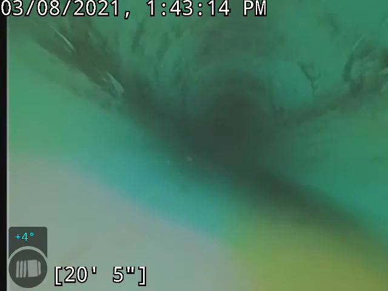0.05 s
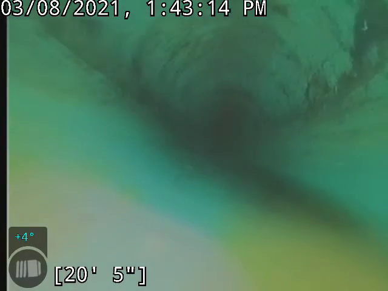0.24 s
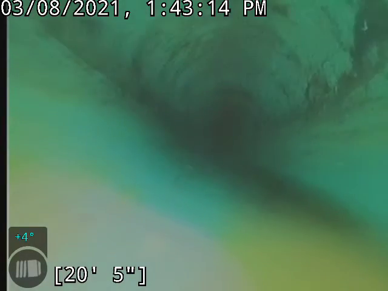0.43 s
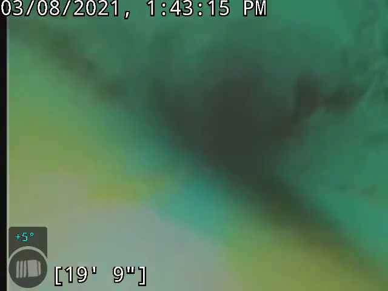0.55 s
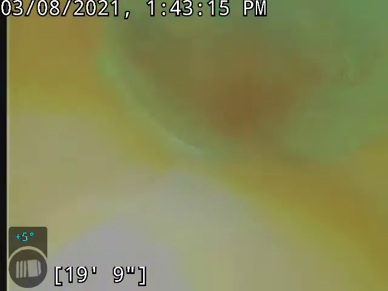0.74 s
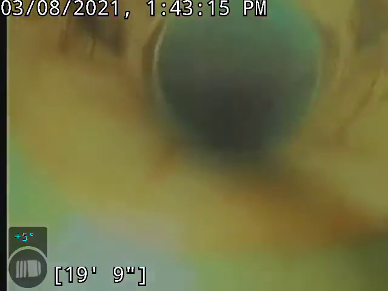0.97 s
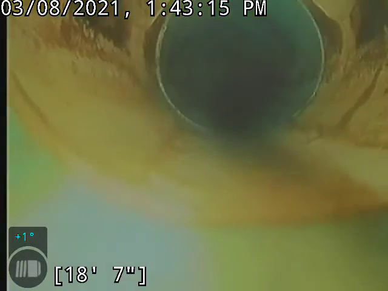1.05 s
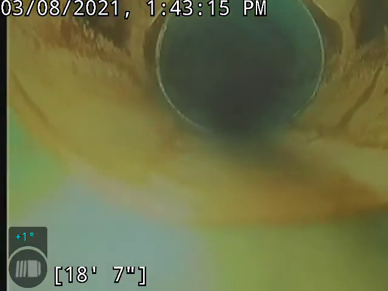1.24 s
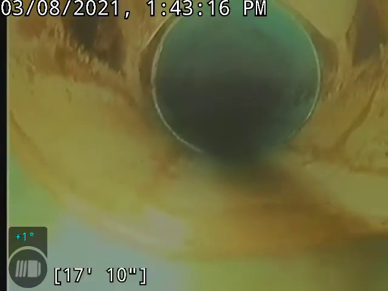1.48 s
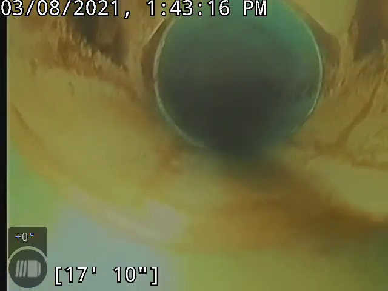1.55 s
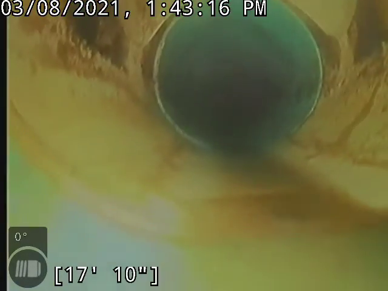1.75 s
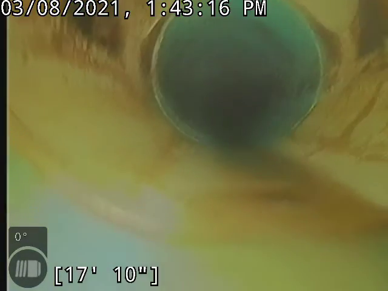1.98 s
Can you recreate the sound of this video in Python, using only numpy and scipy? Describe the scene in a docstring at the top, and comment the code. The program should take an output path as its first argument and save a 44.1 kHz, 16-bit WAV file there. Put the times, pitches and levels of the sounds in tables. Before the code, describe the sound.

A push cable is pulled from a drain onto its reel, close in a small room. Low uneven rumble and scraping open with faint taps; a soft airy swish comes near 0.35 s. Hollow, clacking frame knocks fall at 0.49, 0.89 (softer, duller), 1.28 (strongest, sharper) and 1.69 s, each with a quick rattle. Dull coil thumps continue to 1.8 s; rumble and scrape thin after 1.1 s over quiet low background.

```python
"""In a small room, a push cable is pulled back out of a drain and fed onto its reel.
The reel frame knocks about every 0.4 s: ringing modes and noise bursts, with light cable taps between.
Turns of cable thump dully on the coil, as low modes under a short bump, and the turning reel rumbles.
The cable scrapes in its guide as uneven noise through resonances, and hisses and once swishes as it slides.
A low steady background of coloured noise lies beneath."""
import sys
import numpy as np
from scipy import signal
from scipy.fft import rfft, irfft, next_fast_len
from scipy.io import wavfile
from scipy.ndimage import map_coordinates

SR = 44100
rng = np.random.default_rng(int(sys.argv[2]) if len(sys.argv) > 2 else 0)


def materialize(psi):
    """Save the field psi as 16-bit PCM at rate SR to the path in sys.argv[1].

    A 1-D psi becomes a single channel; in a 2-D psi each row is a channel.
    """
    bounded = np.clip(np.atleast_2d(psi).T, -1, 1)
    quanta = np.round(bounded * 32767).astype(np.int16)
    wavfile.write(sys.argv[1], SR, quanta)


N = 88817  # samples

# Knocks of the reel frame: start_s, level_db, boom_db, hardness_hz (contact low-pass), tick_db,
# crack_db, rattle_delay_s, rattle_db, thock_hz, thock_db; layers are relative to level_db
REEL_KNOCKS = [(0.4863, -29, -5.5, 2320, -30, -3.5, 0.046, -11.5, 798, 5.5),
               (0.8934, -36, 2, 1670, -33, -26, 0.027, -13, 910, 6.5),
               (1.2786, -27, -2, 2400, -7, -12, .04, -11.5, 964, -3),
               (1.6875, -30.5, 1, 2460, -16, -3, 0.014, -1.5, 696, 4)]
# Light taps of the cable: start_s, level_db, hardness_hz, tick_db
CABLE_TAPS = [(0.014, -46.5, 2460, -25), (0.082, -42.5, 1870, -22), (0.439, -45, 2520, -20),
              (0.739, -45.5, 1480, -25), (0.977, -45, 1490, -25), (1.054, -43, 4300, 2),
              (1.186, -45.5, 1410, -23), (1.597, -56.5, 2500, -18), (1.799, -39, 1140, -25)]
# Dull thumps of the coil: start_s, level_db, bump_hz, bump_db
COIL_THUMPS = [(0.309, -38.5, 334, -6), (0.498, -36, 310, 0.5), (0.597, -39.5, 327, -11),
               (0.741, -46, 457, 12.5), (0.903, -33.5, 289, -9), (0.983, -47.5, 342, 9),
               (1.065, -41.5, 337, -10), (1.284, -43, 375, 6), (1.321, -55, 470, 22.5),
               (1.664, -52, 319, 17.5), (1.699, -38.5, 275, 9.5), (1.715, -43, 402, 15),
               (1.802, -31, 314, 4)]
# Modes of the reel frame, then of the coil: pitch_hz, level_db (before scatter), t60_s
FRAME_MODES = [(247, -17, 0.38), (326.3, -11.5, 0.17), (452, -10.5, 0.2), (507, -15, 0.32),
               (721.7, -2.5, .1), (821, -8, 0.071), (927, -6.5, 0.039), (984, -9, 0.091), (1090, -7, 0.042),
               (1326, -10, 0.076), (1654, -11.5, 0.088), (1779, -16.5, 0.076), (1980, -29, 0.072),
               (2477, -20, .09)]
COIL_MODES = [(118.5, -9, 0.25), (150.7, -5.5, 0.29), (181.3, -4, 0.21), (292, -17, 0.14),
              (428.5, -14, 0.15)]

# Spectrum shapes of the noise bursts in a knock: freq_hz, density_db (per Hz, relative)
CLACK_COLOUR = [(150, -42), (350, -15), (570, -1), (800, 2.5), (1300, -5.5), (1800, -2), (2150, -10),
                (2600, -6.5), (3200, -13), (5000, -12.5), (7500, -15), (14000, -13.5)]
BOOM_COLOUR = [(60, -19), (165, 3), (240, -4), (330, 5.5), (460, -3), (600, -10), (1500, -57)]
TICK_COLOUR = [(1500, -35), (4500, -4), (7500, -10), (9500, 5), (13500, -4)]
CRACK_COLOUR = [(800, -12), (1700, 10.5), (2300, 0), (4500, 2), (6500, -21), (9000, -27)]

# Levels over time, before any trim: time_s, level_db
# Rumble, scrape, rubbing resonance, sliding hiss, and one quick slip of the cable
RUMBLE_LEVEL = [(0, -46), (.18, -50.5), (.27, -48), (.35, -44.5), (.5, -48), (.65, -44.5), (.75, -48.5),
                (.84, -46.5), (.93, -43.5), (1.06, -45), (1.16, -54.5), (1.32, -49.5), (1.42, -59),
                (1.65, -55.5), (1.85, -50.5), (2.01, -62)]
SCRAPE_LEVEL = [(0, -54.5), (.12, -54), (.27, -58.5), (.45, -46.5), (.62, -49), (.82, -50), (1.06, -48.5),
                (1.14, -60), (1.25, -58.5), (1.45, -80), (1.62, -60), (1.85, -60.5), (2.01, -75)]
SING_LEVEL = [(0, -54), (.22, -60), (.4, -69), (.75, -60), (1.0, -84), (1.25, -57), (1.42, -82),
              (2.01, -72)]
SLIDE_LEVEL = [(0, -69), (.25, -68.5), (.5, -53.5), (.6, -60.5), (.85, -62.5), (1.05, -63), (1.19, -70.5),
               (1.26, -66), (1.35, -59.5), (1.55, -61), (1.7, -61), (1.87, -68), (2.01, -89)]
SWISH_LEVEL = [(.22, -83), (.3, -51), (.35, -46), (.43, -48), (.52, -57), (.62, -86)]

# Spectrum shapes of the lasting sounds: freq_hz, density_db (per Hz, relative)
RUMBLE_COLOUR = [(20, -31), (58, -17), (76, 4.5), (100, -1), (133, 0), (185, -6.5), (230, -15),
                 (300, -10.5), (400, -11.5), (560, -29), (1200, -54.5)]
SCRAPE_SPECTRUM = [(150, 10), (320, 3), (450, -7.5), (580, -7.5), (730, -5.5), (930, -5.5), (1200, -16),
                   (1500, -7.5), (1750, -8.5), (2100, -10.5), (2600, -9), (3400, -18.5), (5500, -22),
                   (7500, -30), (14000, -49)]
SLIDE_SPECTRUM = [(800, -3), (3000, -12), (5500, -10.5), (7000, -11.5), (7700, -20.5), (9000, -4),
                  (10300, -2.5), (11200, -4), (12500, 2), (14000, -6.5)]
SWISH_SPECTRUM = [(1500, -18), (3800, -20.5), (5500, -12.5), (7500, -14.5), (9000, -9.5), (10300, 0),
                  (12500, -0.5), (14000, -3.5)]
BACKGROUND_COLOUR = [(15, -1.5), (26, -2.5), (40, -1), (52, -4.5), (100, -16.5), (160, -9), (350, -18),
                     (550, -34), (2000, -49), (14000, -74)]

# Decay of the room: freq_hz, t60_s
ROOM_DECAY = [(150, 0.57), (700, 0.22), (2500, 0.34), (6000, 0.54), (13000, 0.033)]
# Colour of the microphone: freq_hz, gain_db
MIC_COLOUR = [(6000, 0), (7000, -2.5), (7650, -2), (8500, 0), (13600, 1.5), (14050, -12)]

# Decays to -60 dB, then attack time constants
CLACK_T60_S, BOOM_T60_S, TICK_T60_S, CRACK_T60_S = 0.076, 0.11, 0.018, 0.015
THOCK_T60_S, BUMP_T60_S = 0.05, 0.063
ATTACK_S, BOOM_ATTACK_S, THOCK_ATTACK_S, THUMP_ATTACK_S = 0.00095, 0.0037, 0.0013, 0.0025
# Layer levels and trims
RING_DB, CLACK_DB, MODE_SCATTER_DB = -5, 1, 2
RUMBLE_TRIM_DB, SCRAPE_TRIM_DB, SLIDE_TRIM_DB = 1.5, -1.5, 0.5
SCRAPE_RING_DB, BACKGROUND_DB = -7, -53
SING_HZ, SING_WIDTH_HZ = 856, 123  # centre and half-width of the rubbing resonance
ROOM_DB, ROOM_DELAY_S = -8.5, 0.006
TOP_HZ = 14050  # band limit


def amp(db):
    """Decibels to gain."""
    return 10 ** (np.asarray(db) / 20)


def unit(x):
    """Scale to rms 1."""
    return x / np.sqrt(np.mean(x ** 2) + 1e-20)


def along(points, hz):
    """Read (Hz, value) points on a log frequency axis."""
    f, v = np.transpose(points)
    return np.interp(np.log(hz + 1), np.log(f + 1), v)


def curve(rows):
    """Join (s, value) points with straight lines, one value per sample."""
    return np.interp(np.arange(N) / SR, *np.transpose(rows))


def wobble(rate_hz):
    """A smooth random curve with rate_hz knots a second."""
    knots = rng.standard_normal(int(N * rate_hz / SR) + 4)
    return map_coordinates(knots, [np.arange(N) * rate_hz / SR])


def filtered(x, response):
    """Shape the spectrum of x by a response of frequency."""
    m = next_fast_len(len(x) + SR // 4)
    return irfft(rfft(x, m) * response(np.fft.rfftfreq(m, 1 / SR)), m)[:len(x)]


def noise(colour, size=N):
    """Coloured noise of rms 1."""
    return unit(filtered(rng.standard_normal(size), lambda hz: amp(along(colour, hz))))


def fade(t, t60):
    """Exponential decay, 60 dB in t60 seconds."""
    return np.exp(-np.log(1000) * t / t60)


def rise(t, attack):
    """Exponential onset with the given time constant in seconds."""
    return 1 - np.exp(-t / attack)


def tone(t, hz, t60):
    """One decaying resonance at a random phase."""
    return np.sin(2 * np.pi * (hz * t + rng.random())) * fade(t, t60)


def ring(modes, t):
    """Sum of damped modes, their levels and phases a little different at every blow."""
    out = np.zeros(len(t))
    for hz, db, t60 in modes:
        out += amp(db + MODE_SCATTER_DB * rng.standard_normal()) * tone(t, hz, t60)
    return out


def add(track, s, x):
    """Mix x into the track at time s."""
    part = track[round(s * SR):][:len(x)]
    part += x[:len(part)]


def in_room(x):
    """A short sound followed by the room's answer, noise that decays at its own rate in each band."""
    hz, t, z = signal.stft(rng.standard_normal(SR // 2), SR, nperseg=256)
    tail = signal.istft(z * fade(t, along(ROOM_DECAY, hz)[:, None]), SR, nperseg=256)[1]
    tail = unit(tail) / np.sqrt(len(tail))  # energy 1
    tail = np.pad(tail, (round(ROOM_DELAY_S * SR), 0))
    return x + amp(ROOM_DB) * signal.fftconvolve(x, tail)[:len(x)]


def contact(t, hard_hz, tick_db):
    """One contact with the frame: ringing modes and a dense clack, duller when soft, and a tick."""
    clack = noise(CLACK_COLOUR, size=len(t)) * fade(t, CLACK_T60_S)
    body = amp(RING_DB) * ring(FRAME_MODES, t) + amp(CLACK_DB) * clack
    body = signal.lfilter(*signal.butter(2, hard_hz, fs=SR), body)
    tick = amp(tick_db) * noise(TICK_COLOUR, size=len(t)) * fade(t, TICK_T60_S)
    return (body + tick) * rise(t, ATTACK_S)


def reel_knocks():
    """Each frame contact has a boom, a crack, a thock set by the point of contact, and one rattle."""
    out, t = np.zeros(N), np.arange(SR // 2) / SR
    swell = rise(t, BOOM_ATTACK_S)
    for (s, db, boom_db, hard_hz, tick_db, crack_db,
         rattle_s, rattle_db, thock_hz, thock_db) in REEL_KNOCKS:
        boom = amp(boom_db) * noise(BOOM_COLOUR, size=len(t)) * swell * fade(t, BOOM_T60_S)
        thock = amp(thock_db) * tone(t, thock_hz, THOCK_T60_S) * rise(t, THOCK_ATTACK_S)
        crack = noise(CRACK_COLOUR, size=len(t)) * fade(t, CRACK_T60_S) * rise(t, ATTACK_S)
        blow = in_room(contact(t, hard_hz, tick_db) + boom)
        add(out, s, amp(db) * (blow + thock + amp(crack_db) * crack))  # thock and crack stay dry
        rattle = in_room(swell * contact(t, hard_hz=1870, tick_db=-23))
        add(out, s + rattle_s, amp(db + rattle_db) * rattle)
    return out


def cable_taps():
    """Light taps of the cable set off the frame's modes, clack and tick."""
    out, t = np.zeros(N), np.arange(SR // 2) / SR
    for s, db, hard_hz, tick_db in CABLE_TAPS:
        add(out, s, amp(db) * in_room(contact(t, hard_hz, tick_db)))
    return out


def coil_thumps():
    """Turns of cable drop against the coil: a short bump over its low modes."""
    out, t = np.zeros(N), np.arange(SR // 2) / SR
    onset = rise(t, THUMP_ATTACK_S)
    for s, db, bump_hz, bump_db in COIL_THUMPS:
        bump = amp(bump_db) * tone(t, bump_hz, BUMP_T60_S)
        add(out, s, amp(db) * onset * (ring(COIL_MODES, t) + bump))
    return out


def reel_rumble(uneven_db=2):
    """The turning reel rolls as low noise, made lumpy by a slow random swell."""
    lumpy = unit(noise(RUMBLE_COLOUR) * amp(uneven_db * wobble(25.12)))
    return amp(RUMBLE_TRIM_DB + curve(RUMBLE_LEVEL)) * lumpy


def cable_scrape(grain_db=0.5, uneven_db=1):
    """Small slips in the guide excite its rubbing resonance and keep the frame ringing."""
    slips = rng.standard_normal(N) * amp(grain_db * wobble(260) + uneven_db * wobble(19.84))
    rub = unit(filtered(slips, lambda hz: amp(along(SCRAPE_SPECTRUM, hz))))
    frame_response = ring(FRAME_MODES, np.arange(SR // 2) / SR)
    frame = unit(signal.fftconvolve(slips, frame_response)[:N])
    sing = unit(filtered(slips, lambda hz: 1 / (1 + ((hz - SING_HZ) / SING_WIDTH_HZ) ** 2)))
    scrape = amp(SCRAPE_TRIM_DB + curve(SCRAPE_LEVEL)) * (rub + amp(SCRAPE_RING_DB) * frame)
    return scrape + amp(curve(SING_LEVEL)) * sing


def cable_hiss(grain_db=1.16, swish_grain_db=1.06):
    """The smooth jacket slides with a fine, high hiss and once slips quickly with a swish."""
    slide_db = SLIDE_TRIM_DB + curve(SLIDE_LEVEL) + grain_db * wobble(300)
    swish_db = curve(SWISH_LEVEL) + swish_grain_db * wobble(300)
    return amp(slide_db) * noise(SLIDE_SPECTRUM) + amp(swish_db) * noise(SWISH_SPECTRUM)


def room_background():
    """The low background of the room: steady coloured noise."""
    return amp(BACKGROUND_DB) * noise(BACKGROUND_COLOUR)


def scene():
    """Reel and cable over the low background of the room."""
    reel = reel_knocks() + coil_thumps() + reel_rumble()
    cable = cable_taps() + cable_scrape() + cable_hiss()
    return (reel + cable + room_background())[None]


def record(dry):
    """The microphone has a dip in the treble; nothing is kept above the band limit."""
    return filtered(dry[0], lambda hz: amp(along(MIC_COLOUR, hz)) * (hz < TOP_HZ))[None]


dry = scene()
out = record(dry)
materialize(out)
```